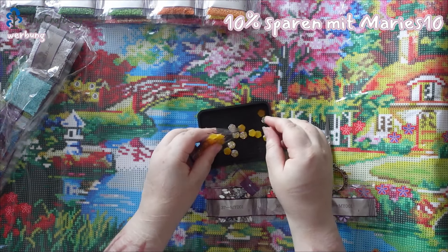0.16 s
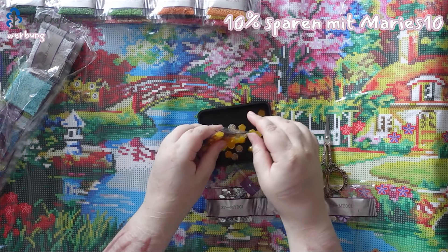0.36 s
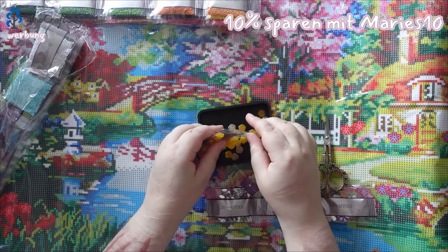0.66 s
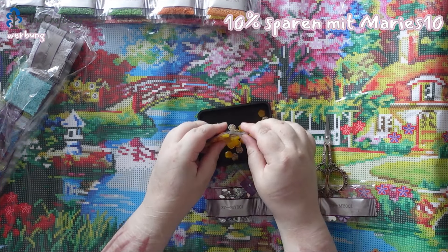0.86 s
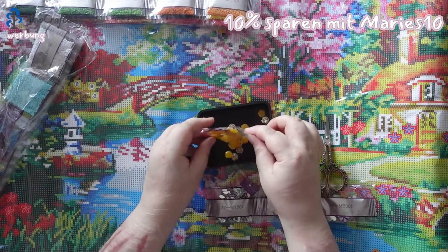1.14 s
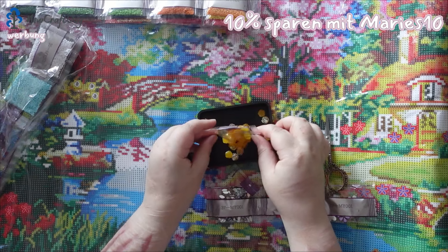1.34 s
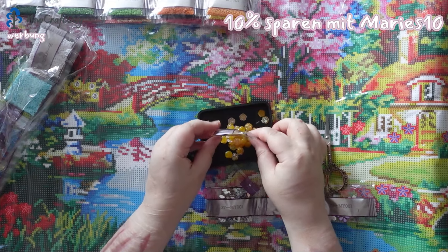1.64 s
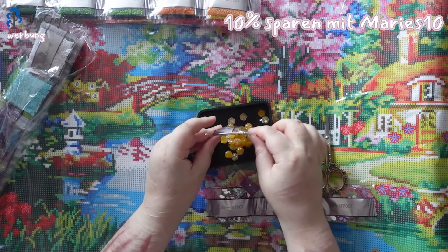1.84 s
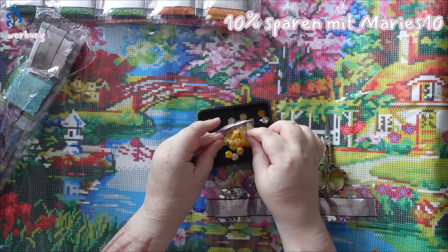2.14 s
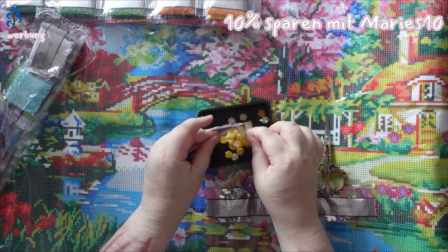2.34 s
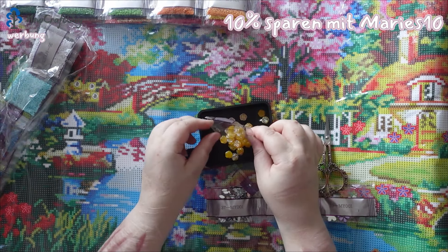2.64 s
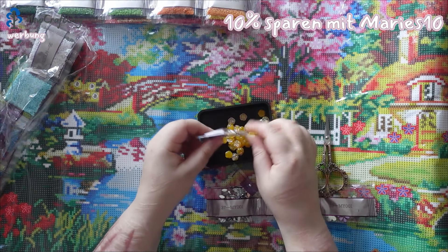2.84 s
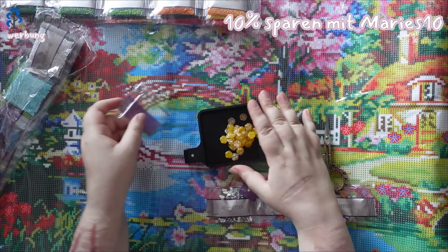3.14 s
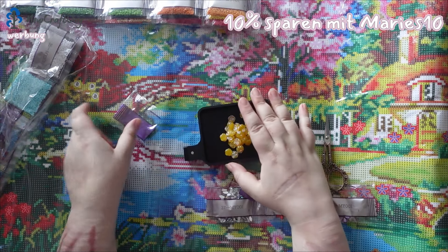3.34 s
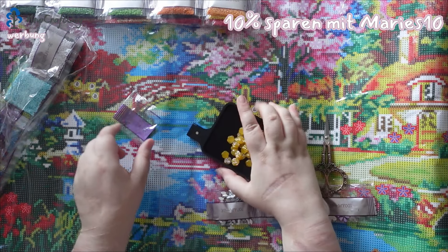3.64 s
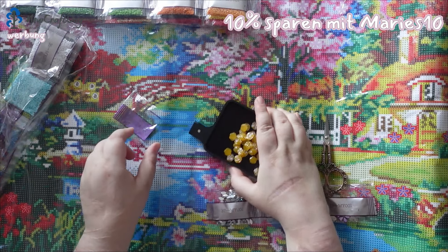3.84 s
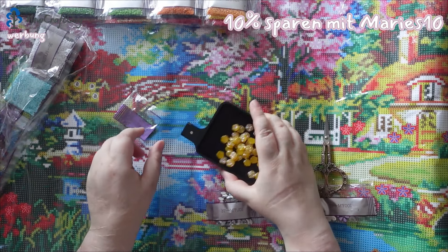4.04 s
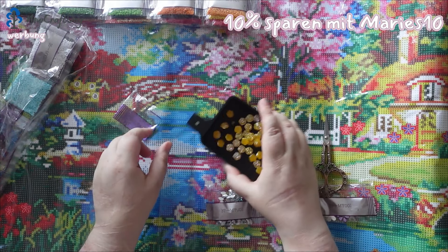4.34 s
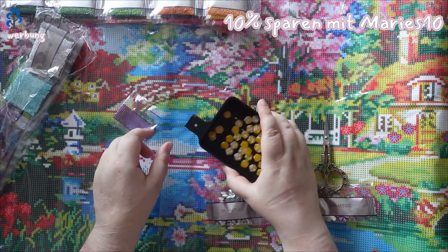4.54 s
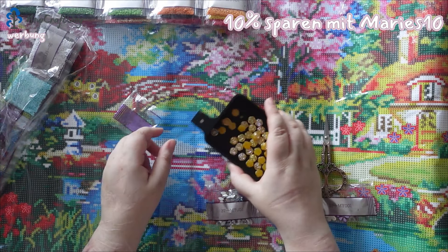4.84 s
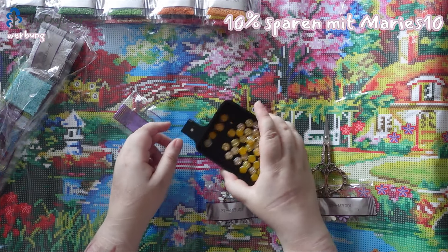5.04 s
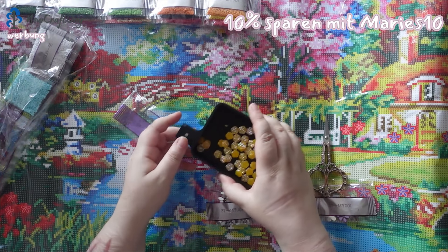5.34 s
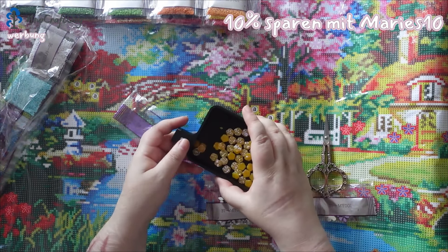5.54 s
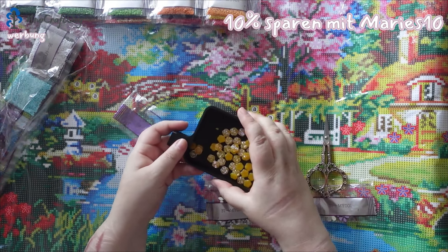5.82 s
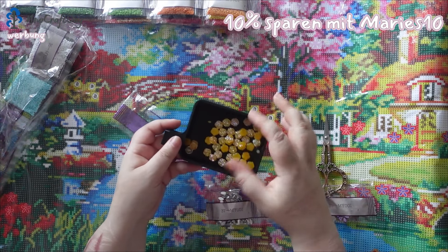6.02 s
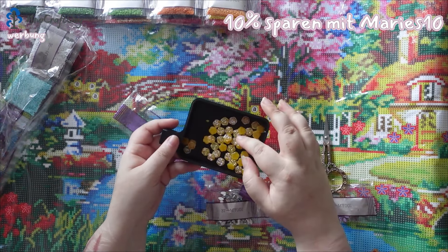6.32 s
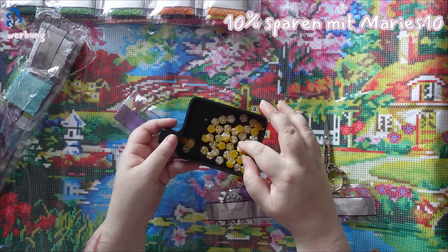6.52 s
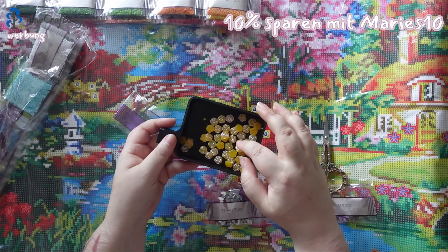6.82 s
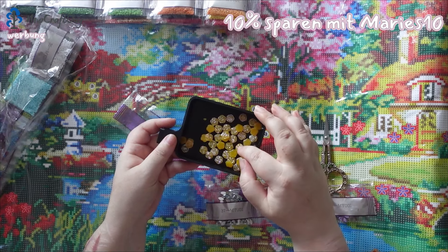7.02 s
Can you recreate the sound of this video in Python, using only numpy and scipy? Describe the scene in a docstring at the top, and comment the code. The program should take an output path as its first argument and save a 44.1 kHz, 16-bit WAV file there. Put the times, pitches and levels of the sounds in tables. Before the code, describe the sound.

Small hard plastic stones clatter from a rustling film bag into a plastic tray, then get shaken in a brisk rattle before a few faint ticks.

```python
"""In a quiet room, small plastic stones are worked out of a film bag and drop into a plastic tray on a mat.
The tray is then lifted and shaken so the stones rattle, and a finger nudges a few of them.
Each knock is a short burst of spiky contacts that rings the tray's modes, with patter of small stones around it.
Random creases make the film rustle; shaped noise makes the room tone, the low throbbing hum, a drone and the echo."""
import sys
import numpy as np
from scipy import signal
from scipy.io import wavfile

SR = 44100
rng = np.random.default_rng(int(sys.argv[2]) if len(sys.argv) > 2 else 0)


def file_out(sig):
    """Save sig as 16-bit WAV at sys.argv[1]."""
    # one column per channel
    cols = np.atleast_2d(sig).T
    # limit, then scale
    lim = np.clip(cols, -1, 1)
    pcm = np.round(lim * 32767).astype(np.int16)
    wavfile.write(sys.argv[1], SR, pcm)


N = 316197

# Room tone spectrum. Each row: frequency in Hz, relative band gain in dB.
ROOM_TONE_SPECTRUM = [(18, -90), (30, -62.5), (135, -9.5), (212, -5), (248, -4.5), (2340, -24.5),
                      (3970, -34), (4530, -33.5), (9730, -39), (15200, -35.5), (16500, -44)]
ROOM_TONE_DB = -61.5
# Likeness of the two ears in the room tone. Each row: frequency in Hz, left-right likeness (1 is mono).
EAR_LIKENESS = [(60, 0.27), (380, 0.38), (2380, 0.25), (15000, 0.53)]
# Low hum passing outside. Each row: time in seconds, level in dB of the lower and of the upper resonance
# at the crest of the throb.
HUM_SWELL = [(0.0, -72, -72.5), (0.6, -60.5, -76), (0.85, -68, -66), (1.115, -52.5, -59),
             (1.56, -59.5, -55.5), (1.9, -75.5, -72.5)]
# Room resonances that catch the hum. Each row: frequency in Hz, width in Hz of one pass.
HUM_RESONANCES = [(118, 16), (194, 20)]
THROBS_PER_S, THROB_CREST_S, THROB_HALF_DEPTH_DB = 4.2, 1.125, 2.5
# Steady faint drone in the room. The one row: frequency in Hz, width in Hz of one pass, level in dB.
ROOM_DRONE = (246, 23, -69.5)
# Decay of the room echo. Each row: frequency in Hz, time to fall by 60 dB in seconds.
ECHO_DECAY = [(700, 0.35), (3000, 0.33), (12000, 0.18)]
ROOM_ECHO_DB = -11

# Film bag rustling faintly in the fingers and on the mat. Each row: time in seconds, level in dB.
FILM_RUSTLE = [(0.0, -55.5), (0.9, -71), (1.2, -60), (1.8, -63.5), (2.2, -66), (3.3, -64), (4.0, -69),
               (4.3, -81.5)]
CREASES_PER_S, FILM_LOW_HZ, FILM_HIGH_HZ = 4000, 2500, 10000

# Stones sliding as the bag is worked and the tray pushed.
# Each row: start in seconds, hold in seconds, relative level in dB.
STONE_SLIDES = [(0.0, 0.016, -27.5), (1.012, 0.037, -43.5), (1.189, 0.057, -37.5), (1.344, 0.057, -35.5),
                (2.978, 0.0079, -34), (3.21, 0.2, -58.5), (3.549, 0.031, -43), (3.617, 0.063, -31),
                (3.904, 0.04, -35.5), (3.698, 0.053, -44.5)]
SLIDE_RISE_DB_PER_S, SLIDE_FALL_DB_PER_S = 697, 250
# Strength of the shaking. Each row: time in seconds, relative level in dB.
SHAKE_STRENGTH = [(4.072, -47), (4.085, -35), (4.125, -27), (4.15, -34), (4.19, -23.5), (4.23, -25.5),
                  (4.34, -29.5), (4.378, -27), (4.44, -25), (4.51, -29), (4.525, -25.5), (4.66, -26),
                  (4.777, -26), (4.922, -35.5), (5.005, -33), (5.05, -27.5), (5.173, -32), (5.31, -31),
                  (5.335, -42), (5.385, -44), (5.395, -62)]
# Knocks of stones on the tray that stand out. Each row: time in seconds, relative level in dB,
# thud in dB (the weight of the lows).
STONE_KNOCKS = [(0.0095, -22, -15.5), (0.031, -24.5, -18.5), (0.0365, -18.5, -23), (0.0575, -19.5, -18),
                (0.0858, -27, -19.5), (0.099, -17, -24), (0.123, -27, -13.5), (0.136, -36, -14),
                (0.2052, -22, -6), (0.27, -30, -7), (0.277, -16.5, -18.5), (0.288, -15.5, -21),
                (0.311, -23, -11), (0.3144, -19, -2), (0.3221, -14, -25.5), (0.3512, -13.5, -17.5),
                (0.37, -22, -19), (0.3856, -12.5, -28), (0.4284, -17, -34.5), (0.444, -27, -40),
                (0.4476, -18, -29), (0.4712, -18.5, -40), (0.485, -38, -34), (0.512, -25.5, -38),
                (0.5266, -26, -27), (0.54, -31, -16.5), (0.6444, -35, -10), (0.6875, -23, -19),
                (0.709, -28.5, -7), (0.7282, -20, -19), (0.786, -33.5, -10), (0.8013, -39.5, -6.5),
                (0.9605, -35.5, 1), (0.9862, -33, -1.5), (1.045, -30.5, -5), (1.0996, -18.5, -7),
                (1.158, -36, -4.5), (1.214, -24, -7), (1.2353, -26, -10), (1.261, -30, -6),
                (1.2807, -16.5, -11), (1.291, -28, -7), (1.3438, -27.5, -12), (1.351, -28, -8),
                (1.361, -15, -12.5), (1.461, -22.5, -13), (1.467, -17, -23.5), (1.4753, -25.5, -20),
                (1.493, -28.5, -10), (1.517, -26.5, -8.5), (1.5252, -19, -9), (1.541, -20, -11),
                (1.5573, -16.5, -19), (1.5743, -17.5, -14), (1.582, -21, -24), (1.6, -23.5, -12),
                (1.6109, -13.5, -16), (1.633, -15.5, -16), (1.6385, -16.5, -27.5), (1.6512, -21, -16),
                (1.6765, -25.5, -5.5), (1.686, -20, -19), (1.7083, -21.5, -6.5), (1.7648, -29, 0.5),
                (1.8676, -21.5, -28.5), (1.884, -31, -2.5), (1.893, -22.5, -12.5), (1.9032, -16, -11),
                (1.9292, -24, -8), (1.941, -18.5, -19), (2.011, -33.5, 1), (2.0221, -23, -8),
                (2.0335, -16.5, -15.5), (2.0421, -15.5, -4.5), (2.109, -24.5, 0.5), (2.125, -25, 2),
                (2.1295, -15.5, -7.5), (2.155, -33.5, -5), (2.1655, -29, -1), (2.173, -27, -3),
                (2.179, -34, -3), (2.219, -34, 4.5), (2.2295, -21.5, -7), (2.2347, -27, -6),
                (2.24, -17.5, -0.5), (2.245, -14, -9), (2.301, -19.5, -17.5), (2.34, -15, -4),
                (2.347, -20, -6), (2.3516, -20.5, -9), (2.364, -20.5, -17), (2.436, -31, -4),
                (2.4455, -20.5, -5.5), (2.465, -24.5, 5), (2.5276, -42, 13.5), (2.5925, -15, -2),
                (2.6897, -41, 10), (2.704, -22.5, 0), (2.751, -38.5, 7), (2.8033, -27.5, -0.5),
                (2.8257, -17.5, -9), (2.842, -24, -4), (2.878, -29.5, -3.5), (2.902, -27.5, -4),
                (2.959, -15, -17.5), (2.992, -20.5, -32.5), (3.0617, -33, 2), (3.137, -39, -6),
                (3.1503, -28.5, -17), (3.1914, -40.5, -6), (3.244, -46, 8), (3.2673, -41, -0.5),
                (3.2915, -40.5, -10), (3.343, -41.5, -4.5), (3.522, -35, -17), (3.555, -35, -31.5),
                (3.5698, -29.5, -32), (3.605, -24.5, -16), (3.6133, -21, -19), (3.703, -29, -18),
                (3.729, -31.5, -19), (3.803, -34, -11), (3.893, -44, -8), (3.91, -27.5, -19),
                (3.935, -25.5, -22), (3.957, -35, -12.5), (4.067, -48, -2), (4.09, -28.5, -11),
                (4.097, -25, -8), (4.1826, -20, -8.5), (4.2048, -18.5, -10.5), (4.2572, -19.5, -11),
                (4.3, -25, -10.5), (4.313, -23.5, -14), (4.3492, -29.5, -8), (4.3707, -19, -7.5),
                (4.397, -24, -8.5), (4.43, -23, -11), (4.438, -15, -8.5), (4.471, -26, -7),
                (4.4972, -27, -11), (4.521, -23.5, -9), (4.5375, -22, -8), (4.6091, -23.5, -10.5),
                (4.6167, -16, -10.5), (4.6894, -25.5, -8), (4.7057, -20.5, -9.5), (4.7586, -21, -9.5),
                (4.8096, -22, -10), (4.8804, -20, -11.5), (4.9638, -23.5, -6.5), (5.027, -19, -6),
                (5.0706, -34, -10.5), (5.0943, -23, -6), (5.125, -17.5, -10), (5.1357, -15, -7),
                (5.2037, -14.5, -7), (5.2402, -23.5, -8), (5.283, -21.5, -6), (5.3039, -19.5, -8.5),
                (5.341, -28, -4), (5.353, -38, 3), (5.3605, -39, -1), (5.4197, -37.5, 3),
                (5.5051, -45, -15.5), (5.7285, -38, 9), (5.852, -57.5, 15), (6.2946, -58, -4.5),
                (6.591, -50.5, -16), (6.9832, -42, -23.5), (6.992, -35.5, -25), (7.0184, -40.5, -30),
                (7.0245, -31.5, -30), (7.0372, -39, -25), (7.0455, -41, -20)]
# every knock on the lying tray sets its neighbours skittering
SKITTER_DB, SETTLE_DB_PER_S = -21.5, 380
THUD_DAMPS = 0.18   # dB of skitter lost per dB of thud: dull blows stir less
LIFTED_FROM_S, HELD_FROM_S = 4.05, 5.8

# Tray resonances damped by the mat. Each row: frequency in Hz, width in Hz, relative level in dB.
LYING_MODES = [(1125, 190, 0.5), (1925, 323, 4), (2370, 140, 5.5), (3240, 140, -5.5), (3620, 110, -13.5),
               (4213, 370, 1.5), (4590, 150, 1.5), (5310, 61, -7.5), (6220, 170, -8.5), (6260, 100, -3.5),
               (7237, 130, -2.5), (9430, 300, -4.5), (11630, 130, -9)]
# Tray resonances free in the hand. Each row: frequency in Hz, width in Hz, relative level in dB.
LIFTED_MODES = [(838, 23, -14.5), (1080, 250, -3.5), (1553, 222, 1), (2446, 202, 1), (2740, 120, 2),
                (3317, 120, -3.5), (3960, 71, -6), (4840, 106, 0.5), (5355, 60, -1), (6190, 120, 0),
                (6970, 150, -5.5), (8150, 155.5, -4.5), (10020, 1050, -4), (11760, 170, -5.5)]
# Tray resonances while held still. Each row: frequency in Hz, width in Hz, relative level in dB.
HELD_MODES = [(1400, 330, -7), (3340, 100, -5), (4040, 200, -6), (5320, 150, -6.5), (6350, 150, -9),
              (6890, 160, -15), (10800, 1800, -13.5)]
# Dense unresolved modes under the lying peaks. Each row: frequency in Hz, relative band gain in dB.
LYING_DENSE = [(180, -52), (300, -13.5), (1210, 2), (1550, -13), (2000, -8.5), (3090, 0.5), (4690, -2.5),
               (14900, -8.5), (16500, -22)]
# Dense unresolved modes under the lifted and held peaks. Each row: frequency in Hz, relative band gain in dB.
LIFTED_DENSE = [(470, -36.5), (800, -6.5), (1100, 7), (2040, -2.5), (4770, -7), (5840, -0.5), (9820, -5),
                (15100, -11), (16500, -29)]

CUTOFF_HZ = 16700   # everything above lies at least 60 dB down


def from_db(db):
    """Decibels to gain."""
    return 10 ** (np.asarray(db) / 20)


def rms_one(x):
    """Scale to unit rms."""
    return x / np.sqrt(np.mean(x ** 2) + 1e-20)


def in_time(rows, at):
    """Curve columns read at the given samples; far below hearing outside the rows."""
    s, *columns = np.transpose(rows)
    return [np.interp(at / SR, s, column, left=-150, right=-150) for column in columns]


def at_hz(points, hz):
    """Read a spectrum table on a log-frequency axis."""
    table_hz, values = np.array(points).T
    return np.interp(np.log(hz), np.log(table_hz), values)


def resonance(x, hz, width):
    """Two-pole band-pass with gain 1 on top: the wider it is, the faster its ring dies."""
    r = np.exp(-np.pi * width / SR)
    feedback = [1, -2 * r * np.cos(2 * np.pi * hz / SR), r * r]
    return signal.lfilter([(1 - r * r) / 2, 0, (r * r - 1) / 2], feedback, x)


def filtered(x, order, hz, kind):
    """Butterworth filter along the last axis."""
    return signal.sosfilt(signal.butter(order, hz, kind, fs=SR, output="sos"), x)


def bands(low, high, count):
    """Centres and band-pass filters that tile a range evenly in log pitch."""
    edges = np.geomspace(low, high, count + 1)
    return [(np.sqrt(a * b), signal.butter(2, [a, b], "band", fs=SR, output="sos"))
            for a, b in zip(edges, edges[1:])]


def room_tone():
    """Steady stereo noise, each band with its own level and likeness of the ears."""
    out = 0
    white = rng.standard_normal((2, 2, N))
    for k, (hz, sos) in enumerate(bands(30, 17500, count=20)):
        mid, side = signal.sosfilt(sos, white[k % 2])   # neighbouring bands draw on different noise
        alike = np.clip(at_hz(EAR_LIKENESS, hz), -1, 1)
        stereo = np.sqrt(1 + alike) * mid + np.sqrt(1 - alike) * side * [[1], [-1]]
        out = out + from_db(at_hz(ROOM_TONE_SPECTRUM, hz)) * stereo
    return from_db(ROOM_TONE_DB) * rms_one(out)


def hum():
    """Noise ringing in narrow low resonances: two that swell, throb and fade, one that stays."""
    throb = np.cos(2 * np.pi * THROBS_PER_S * (np.arange(N) / SR - THROB_CREST_S))
    throb_db = THROB_HALF_DEPTH_DB * (throb - 1)
    levels = [db + throb_db for db in in_time(HUM_SWELL, np.arange(N))] + [ROOM_DRONE[2]]
    modes = list(HUM_RESONANCES) + [ROOM_DRONE[:2]]
    out = 0
    for db, mode in zip(levels, modes):
        ringing = resonance(resonance(rng.standard_normal(N), *mode), *mode)
        out = out + from_db(db) * rms_one(ringing)
    return out


def room_echo(x, side_db):
    """Reflections as noise that dies band by band, mostly alike at both ears."""
    t = np.arange(SR // 2) / SR
    white = rng.standard_normal((2, len(t)))
    tail = sum(signal.sosfilt(sos, white) * from_db(-60 * t / at_hz(ECHO_DECAY, hz))
               for hz, sos in bands(297, 16330, count=8))
    build_up = np.clip(t / 0.0024, 0, 1)   # over the first reflections
    tail *= build_up / np.sqrt(np.sum(tail[0] ** 2))
    x = filtered(x, 1, 900, "high")   # little of the lows reaches the walls
    mid, side = signal.fftconvolve(x[None], tail, axes=1)[:, :N]
    side = from_db(side_db) * filtered(side, 2, [3000, 11000], "band")
    return np.array([mid + side, mid - side])


def bag():
    """Dense tiny creases of thin film, bright, partly different at the two ears."""
    strike = rng.random((2, N)) < CREASES_PER_S / SR
    strength = rng.standard_normal((2, N)) * from_db(2.5 * np.minimum(rng.exponential(1, (2, N)), 3))
    creases = strike * strength
    mid, side = rms_one(filtered(creases, 1, (FILM_LOW_HZ, FILM_HIGH_HZ), "band"))
    level_db, = in_time(FILM_RUSTLE, np.arange(N))
    return from_db(level_db) * (mid + from_db(-13.0) * side * [[1], [-1]])


def slides():
    """Level in dB of the sliding stones: rise, hold, fall."""
    t = np.arange(N) / SR
    curves = []
    for start_s, hold_s, db in STONE_SLIDES:
        rise_db = SLIDE_RISE_DB_PER_S * np.maximum(start_s - t, 0)
        fall_db = SLIDE_FALL_DB_PER_S * np.maximum(t - start_s - hold_s, 0)
        curves.append(db - rise_db - fall_db)
    return np.max(curves, axis=0)


def skitter(knocks):
    """Level in dB of the small stones: a dying stir after every knock."""
    s, level_db, thud_db = knocks.T
    power = np.full(N, 1e-18)
    power[(s * SR).astype(int)] = from_db(2 * (level_db + SKITTER_DB - THUD_DAMPS * thud_db))
    keep_per_sample = from_db(-2 * SETTLE_DB_PER_S / SR)
    return 10 * np.log10(signal.lfilter([1], [1, -keep_per_sample], power))


def small_knocks(stir_db, knocks, per_s, spread_db, offset_db, thud_drop_db):
    """Random contacts with a long-tailed strength, the weight of their lows set against the knocks around them."""
    chance, size = rng.random(N), rng.exponential(1, N)
    at = np.flatnonzero((chance < per_s / SR) & (stir_db > -80))   # none where the stir is inaudible
    level_db = stir_db[at] + offset_db + spread_db * np.minimum(size[at], 2.5)
    thud_db = np.interp(at / SR, knocks[:, 0], knocks[:, 2]) - thud_drop_db   # a negative drop adds lows
    return np.column_stack([at / SR, level_db, thud_db])


def tray(knocks, peaks, body, peak_db, chatter_ms, scatter_db, lean_db):
    """A knock is a short chatter of contacts; it drives each mode and band with a strength of its own."""
    s, level_db, thud_db = np.transpose(knocks)
    at = np.clip(np.round(s * SR).astype(int), 0, N - 1)
    # hard blows are bright; broad, thudding ones are dull
    crack_db = 0.25 * (level_db + 26.5) - 0.25 * np.maximum(thud_db + 23.0, 0)
    crack_db = crack_db + rng.normal(0, 2.0, len(at))

    # uneven, spiky touches under an envelope that rises over 0.8 ms and fades with the chatter
    touch_gain = from_db(2.7 * np.minimum(rng.exponential(1, N), 4))
    contact = rms_one(rng.choice([-1., 1.], N) * touch_gain)
    fade, rise = np.exp(-1000 / (np.array([chatter_ms, .8]) * SR))
    envelope_feedback = np.convolve([1, -fade], [1, -rise])

    # ringing peaks first, then bands for the dense modes
    parts = [(hz, width, db + peak_db) for hz, width, db in peaks]
    parts += [(hz, sos, at_hz(body, hz)) for hz, sos in bands(body[1][0] / 2, 17000, count=14)]
    scatter, lean = rng.standard_normal((2, len(at), len(parts)))
    out = np.zeros((2, N))
    for k, (hz, shape, db) in enumerate(parts):
        low = at_hz([(1200, 1), (2000, 0)], hz)    # share of the thud
        high = at_hz([(5000, 0), (9000, 1)], hz)   # share of the crack
        wide = hz > 2500
        blows = np.full((2 if wide else 1, N), 1e-18)
        blow_db = level_db + db + low * (thud_db + 3.5) + high * crack_db + scatter_db * scatter[:, k]
        gain = from_db(blow_db)
        np.add.at(blows[0], at, gain)
        if wide:   # high modes radiate unevenly to the sides, by a random lean for each blow
            np.add.at(blows[1], at, gain * from_db(lean_db) * lean[:, k])
        force = contact * signal.lfilter([1 - rise], envelope_feedback, blows)
        rung = resonance(force, hz, shape) if np.isscalar(shape) else signal.sosfilt(shape, force)
        mid, side = rung[0], rung[1:].sum(axis=0)
        out += (-1) ** k * (mid + side * [[1], [-1]])   # neighbouring parts in opposite phase
    return out


def stones():
    """Single knocks and the random patter: the tray lies, is shaken, then held still."""
    knocks = np.array(STONE_KNOCKS)
    drops = knocks[knocks[:, 0] < LIFTED_FROM_S]
    rattles = knocks[knocks[:, 0] >= LIFTED_FROM_S]
    shake_db, = in_time(SHAKE_STRENGTH, np.arange(N))
    skittering = small_knocks(skitter(drops), drops, per_s=1100, spread_db=4.5, offset_db=-10.0, thud_drop_db=-2.5)
    sliding = small_knocks(slides(), drops, per_s=2500, spread_db=3.5, offset_db=-17.0, thud_drop_db=1.0)
    shaking = small_knocks(shake_db, rattles, per_s=2200, spread_db=3.5, offset_db=-13.5, thud_drop_db=1.5)
    on_mat = np.vstack([drops, skittering, sliding])
    in_hand = np.vstack([rattles, shaking])
    still = in_hand[:, 0] > HELD_FROM_S

    lying = tray(on_mat, LYING_MODES, LYING_DENSE,
                 peak_db=3.0, chatter_ms=0.89, scatter_db=3.5, lean_db=-18.0)
    shaken = tray(in_hand[~still], LIFTED_MODES, LIFTED_DENSE,
                  peak_db=4.5, chatter_ms=0.92, scatter_db=3.5, lean_db=-16.0)
    held = tray(in_hand[still], HELD_MODES, LIFTED_DENSE,
                peak_db=20.5, chatter_ms=3.1, scatter_db=5.5, lean_db=-25.0)
    # a small free tray radiates almost nothing below its first mode
    lifted = filtered(shaken + from_db(-9.5) * held, 8, 820, "high")
    return from_db(4.5) * lying + from_db(4.0) * lifted


def scene():
    """Tray near the microphone, its room echo, the bag and the background."""
    near = stones()
    echo = room_echo(near.mean(axis=0), side_db=-6.0)
    return near + from_db(ROOM_ECHO_DB) * echo + bag() + room_tone() + hum()


def record(dry):
    """The sharpest peaks are rounded, the top is cut."""
    ceiling = .4
    rounded = ceiling * np.tanh(dry / ceiling)
    return signal.sosfilt(signal.cheby2(12, 60, CUTOFF_HZ, fs=SR, output="sos"), rounded)


dry = scene()
out = record(dry)
file_out(out)
```